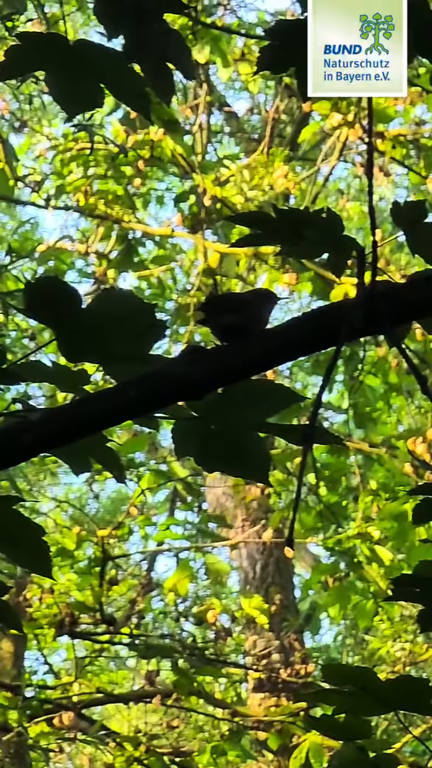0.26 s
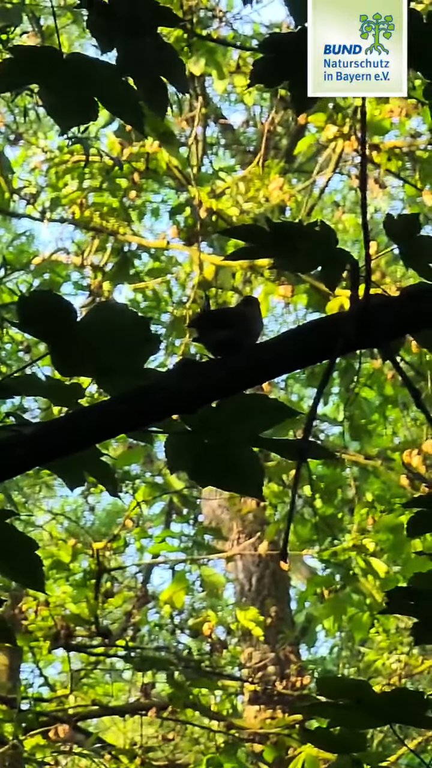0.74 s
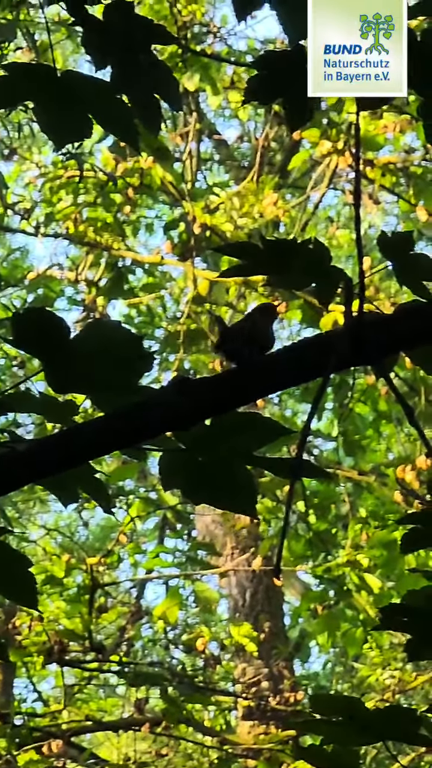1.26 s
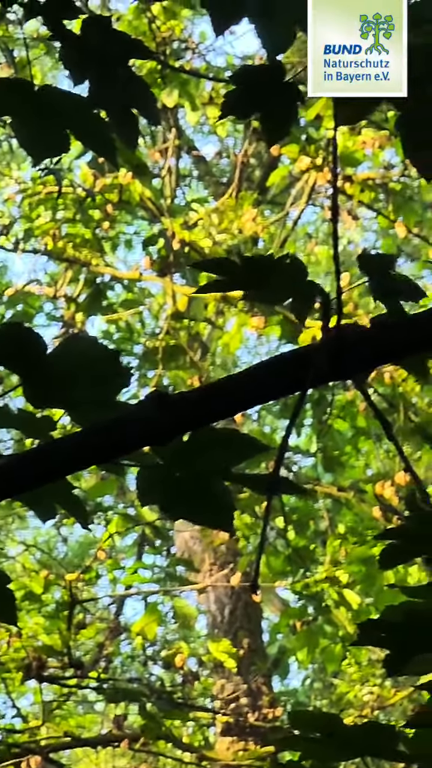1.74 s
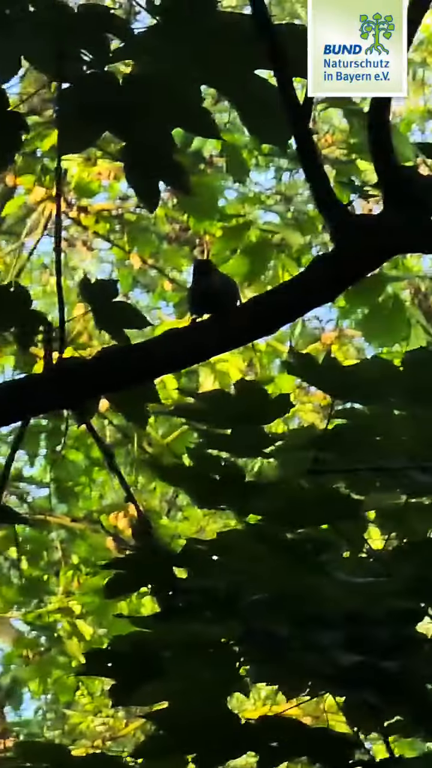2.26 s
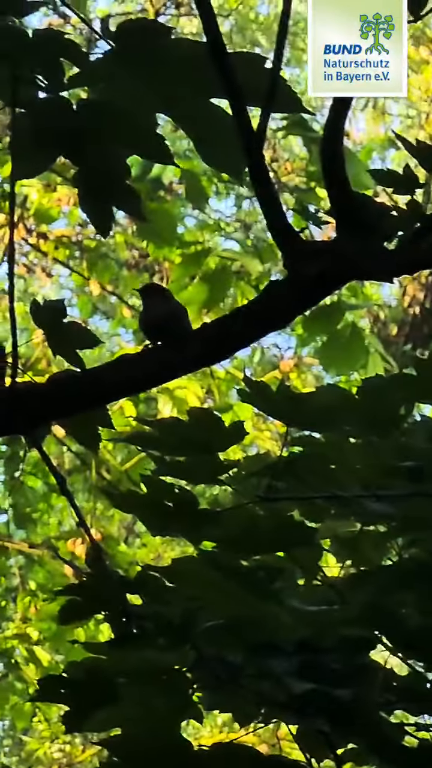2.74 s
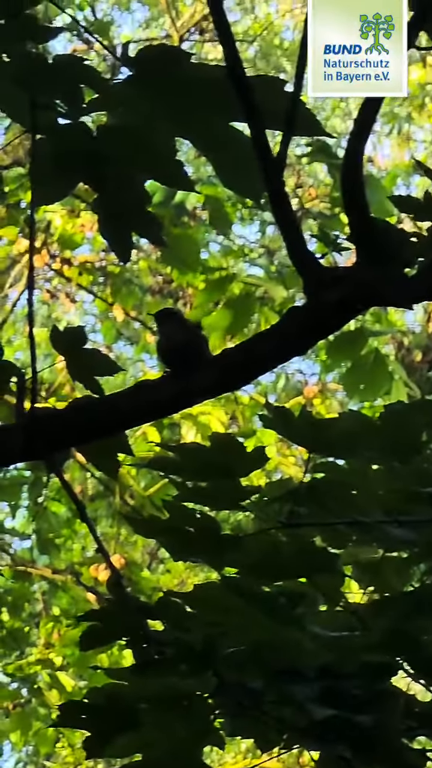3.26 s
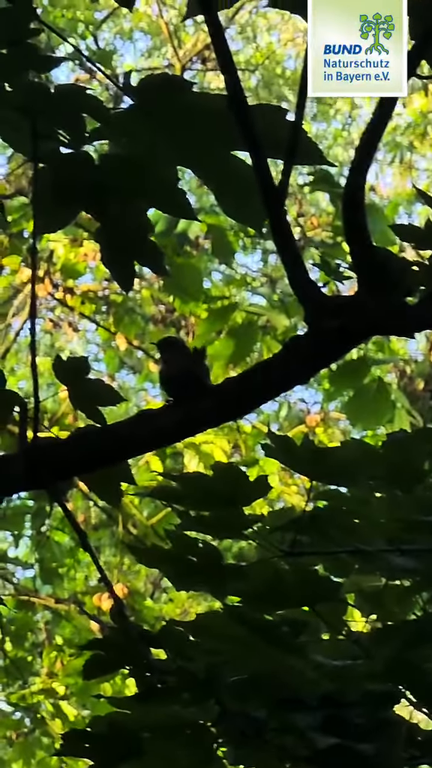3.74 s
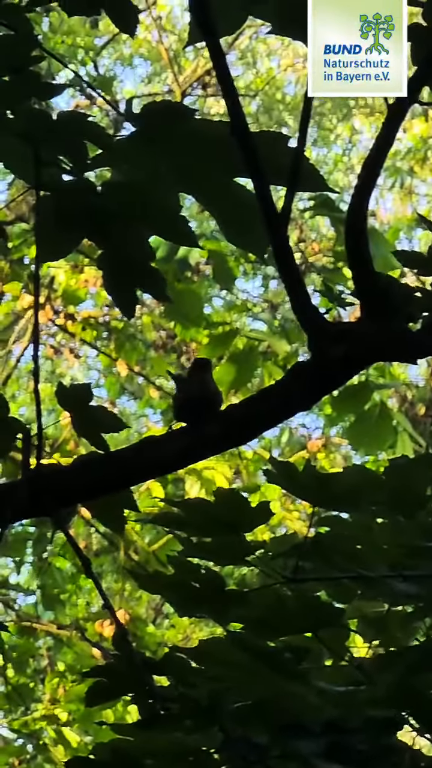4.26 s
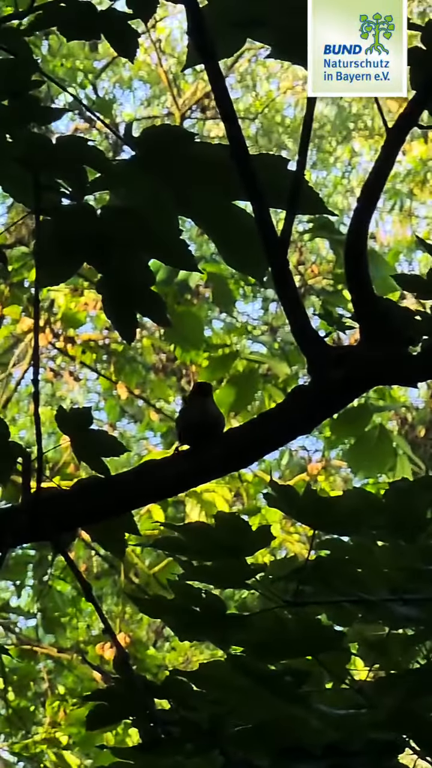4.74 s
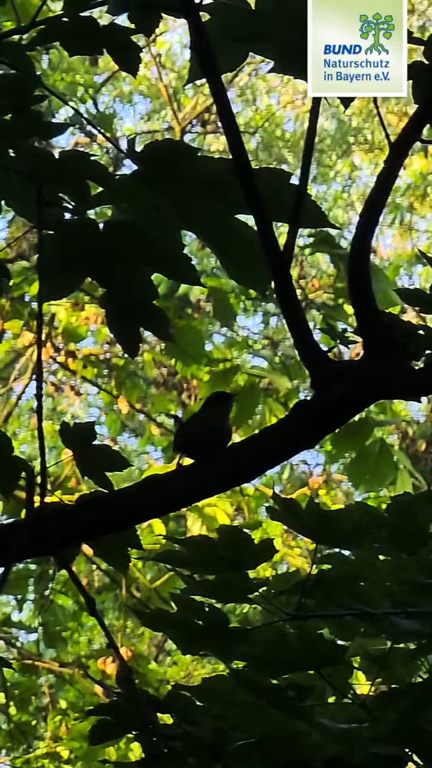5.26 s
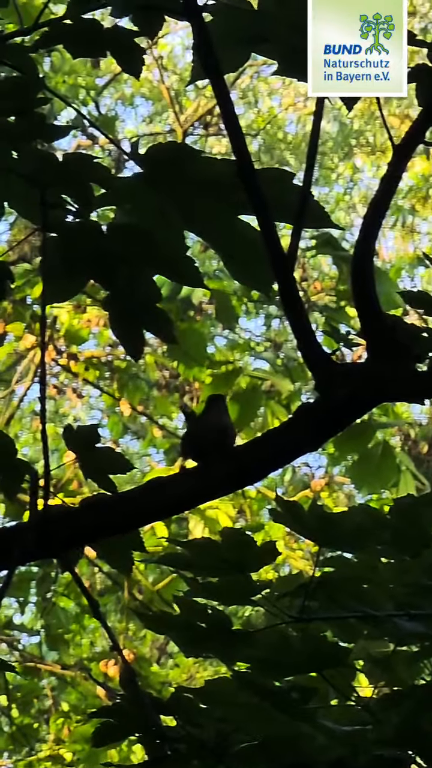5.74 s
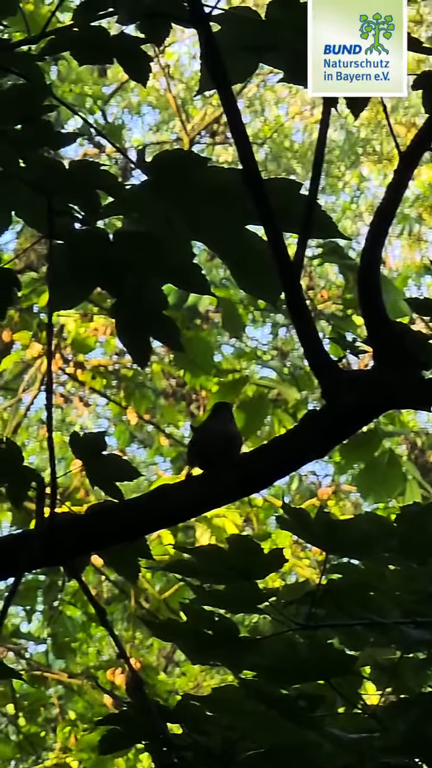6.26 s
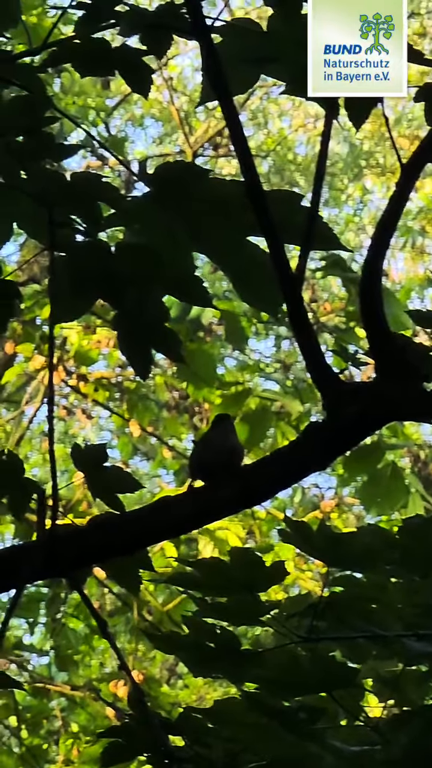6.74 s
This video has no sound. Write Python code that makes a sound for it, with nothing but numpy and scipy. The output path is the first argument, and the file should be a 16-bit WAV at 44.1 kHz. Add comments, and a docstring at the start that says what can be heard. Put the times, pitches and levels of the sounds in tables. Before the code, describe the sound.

A small wren close by sings one long, rapid song of slurs, upsweeps, trill and rattle while distant birds whistle in an echoing wood.

```python
"""Over a low distant rumble that swells, far birds whistle and warble from the start, one with a thin high call.
From a quarter second a far chaffinch joins in: buzzy falling sweeps, quicker ones, rising chirps, a flourish.
From 1.2 s a near wren sings one long song of slurs, upsweeps, a fast trill, couplets and a rattle of ticks.
Each note is a gliding tone with faint overtones; branch and leaves scatter it and the wood rings on."""
import sys
import numpy as np
from scipy import signal
from scipy.fft import rfft, irfft
from scipy.io import wavfile
from scipy.ndimage import uniform_filter1d, minimum_filter1d

SR = 44100
rng = np.random.default_rng(int(sys.argv[2]) if len(sys.argv) > 2 else 0)


def int16_out(signal):
    """Quantize to a 16-bit WAV file."""
    q = np.round(np.clip(np.atleast_2d(signal).T, -1, 1) * 32767)
    wavfile.write(sys.argv[1], SR, q.astype(np.int16))


N = 308700
FREQS = np.fft.rfftfreq(2 * N, 1 / SR)  # padded to twice the length, so filters do not wrap round
FAR_OVERTONE_DB = -27.5  # overtones are lost on the way through the wood


def undb(db):
    """Decibels to gain."""
    return 10 ** (np.asarray(db) / 20)


def at_hz(points, hz):
    """Read (Hz, value) points on a log-frequency axis."""
    f, value = np.transpose(points)
    return np.interp(np.log(np.maximum(hz, 1)), np.log(f), value)


def colour(x, gain):
    """Filter by a gain for each of FREQS."""
    return irfft(rfft(x, 2 * N) * gain)[..., :N]


def unit(x):
    """Scale to rms 1."""
    return x / np.sqrt(np.mean(x ** 2))


def walk(size, rate):
    """Smooth chance with a spread a little under 1, heading for a new value rate times a second."""
    k = max(int(SR / rate), 1)
    steps = np.repeat(rng.standard_normal(size // k + 1), k)
    return uniform_filter1d(steps, k)[:size]


def add(out, s, x):
    """Mix x into out from time s."""
    i = max(int(s * SR), 0)
    out[i:i + len(x)] += x[:max(N - i, 0)]


def spread(length_s, pitch):
    """Even times for the points of a pitch path."""
    return np.linspace(0, length_s, len(pitch))


def bent(from_hz, to_hz, bend):
    """Pitch path whose steps shrink exponentially (grow, if bend is negative), evenly spaced in time."""
    steps = np.exp(-bend * np.linspace(0, 1, 16))
    way = np.concatenate([[0], np.cumsum(steps)])
    return from_hz + (to_hz - from_hz) * way / way[-1]


def glide(times, values, size, ease_s=0.0013):
    """A control moving through its points, its corners rounded by the muscles' inertia."""
    line = np.interp(np.linspace(times[0], times[-1], size), times, values)
    return uniform_filter1d(line, int(np.clip(ease_s * SR, 1, size // 4)), mode="nearest")


# How strongly overtones radiate, before each voice's own offset.
# Each row: frequency in Hz, level against the fundamental in dB.
OVERTONE_LEVELS = [(8300, -43), (10000, -48), (12000, -38), (15000, -26.5)]


def syrinx(times, pitch, levels, fade_s, waver=0.0063, waver_hz=400, overtone_db=0):
    """One note: a gliding tone that wavers a little, with faint second and third harmonics."""
    size = max(int((times[-1] - times[0]) * SR), 64)
    u = np.linspace(0, 1, size)
    hz = glide(times, pitch, size) * (1 + waver * walk(size, rate=waver_hz))
    db = np.interp(u, (np.arange(len(levels)) + .5) / len(levels), levels)
    # a note swells in twice as slowly as it stops
    from_edge = np.minimum(u, 2 * (1 - u)) * size / SR
    gate = np.sin(np.pi / 2 * np.clip(from_edge / fade_s, 0, 1)) ** 2
    phase = 2 * np.pi * np.cumsum(hz) / SR
    tone = np.sin(phase)
    for k in (2, 3):
        in_range = np.clip((SR / 2 - k * hz) / (SR / 20), 0, 1)  # fades out towards half the sample rate
        strength = undb(overtone_db + at_hz(OVERTONE_LEVELS, k * hz)) * in_range
        tone = tone + strength * np.sin(k * phase)
    return np.sqrt(2) * undb(db) * gate * tone


def repeat(syllable, fade_s, waver=0.014, waver_hz=400, overtone_db=0, scatter=0.0083):
    """One syllable at a steady beat, its pitch shifted by chance each time; some series grow louder.

    Pitches and levels (before the mix) are spread evenly over the syllable."""
    out = np.zeros(N)
    for k in range(syllable["count"]):
        pitch = np.array(syllable["pitch_hz"]) * (1 + scatter * rng.standard_normal())
        levels = np.array(syllable["level_db"]) + k * syllable.get("grow_db", 0)
        times = spread(syllable["length_s"], pitch)
        note = syrinx(times, pitch, levels, fade_s, waver, waver_hz, overtone_db)
        add(out, syllable["start_s"] + k * syllable["period_s"], note)
    return out


def far_notes(table, bend, waver, waver_hz, ends_db):
    """Wavering slurs from deeper in the wood, each swelling to its middle."""
    out = np.zeros(N)
    for start, length, from_hz, to_hz, db in table:
        pitch = bent(from_hz, to_hz, bend)
        levels = [db + ends_db, db, db, db + ends_db]
        note = syrinx(spread(length, pitch), pitch, levels, 0.0069, waver, waver_hz, FAR_OVERTONE_DB)
        add(out, start, note)
    return out


# Spectrum of distant rumble and air. Each row: frequency in Hz, relative level per Hz in dB.
AIR_SPECTRUM = [(20, -33.5), (40, -11), (62, 1), (90, -9.5), (140, -19.5), (230, -16.5), (500, -26),
                (850, -23), (1600, -34.5), (3000, -25), (6500, -35), (9000, -60)]
# Swell of the rumble. Each row: time in seconds, gain in dB.
RUMBLE_SWELL = [(0, -2), (2.5, -2.5), (5.302, -5), (6.201, 3), (7, -4)]


def air(apart_hz=1500, rumble_hz=110, level_db=-52.5, drift_db=2.3):
    """Shaped noise: far rumble that swells, nearly alike at both ports, under a soft unrelated rustle."""
    mid, side = rng.standard_normal((2, N))
    gain = undb(at_hz(AIR_SPECTRUM, FREQS))
    width = np.clip(FREQS / apart_hz, .16, 1)  # the ports differ more as frequency rises
    both = unit(colour(mid, gain) + colour(side, gain * width) * np.array([[1], [-1]]))
    rumble = colour(both, 1 / (1 + (FREQS / rumble_hz) ** 4))
    swell = undb(np.interp(np.arange(N) / SR, *np.transpose(RUMBLE_SWELL)))
    return (both + (swell - 1) * rumble) * undb(level_db + drift_db * walk(N, rate=3))


def twitter(end_s=2.8, notes_per_s=8, length_s=.03, low_hz=2500, high_hz=3800, glide_share=.25, db=-49):
    """Rows of faint short slurs behind the finch, at chance times, pitches and glides up or down."""
    rows = []
    for when, height, way in rng.random((int(notes_per_s * end_s), 3)):
        hz = low_hz + (high_hz - low_hz) * height
        to_hz = hz * (1 + glide_share * (2 * way - 1))
        rows.append((when * end_s, length_s, hz, to_hz, db))
    return rows


# The clearer whistles of other birds.
# Each row: start in seconds, length in seconds, pitch from and to in Hz, level in dB.
WHISTLE_NOTES = [(.028, 0.032, 3850, 3220, -39), (.07, 0.084, 3337, 3272, -40),
                 (.125, 0.028, 3210, 4380, -49), (.13, 0.027, 3060, 2490, -45),
                 (.195, 0.025, 2880, 2640, -42), (1.55, 0.033, 3280, 3436, -35.5),
                 (2.1, 0.06, 1647, 1795, -53), (2.765, 0.032, 3190, 3810, -37.5),
                 (3.43, 0.03, 3450, 2970, -38.5), (3.515, 0.051, 2850, 2703, -42.5),
                 (3.62, 0.32, 2060, 2247, -59.5), (4.64, 0.045, 926, 1695, -60.5),
                 (4.675, 0.078, 1765, 2563, -43), (5.14, .16, 2204, 2306, -52),
                 (5.462, 0.027, 4980, 4580, -41), (5.712, 0.054, 2920, 2604, -39),
                 (5.805, 0.021, 2990, 2987, -28.5), (5.903, 0.032, 3925, 3110, -31.5),
                 (6.47, 0.09, 3480, 3525, -50.5), (6.83, 0.039, 3400, 3350, -49.5)]


def whistles():
    """Far slurs that waver slowly and settle on their last pitch, with the twitter among them."""
    return far_notes(WHISTLE_NOTES + twitter(), bend=1.8, waver=0.016, waver_hz=82, ends_db=-2)


# A thin, very high call. Keys: start, period and length in seconds, count, pitch in Hz, level in dB.
THIN_SYLLABLE = dict(start_s=.265, period_s=0.32, count=3, length_s=0.21, pitch_hz=[7600, 8250, 8300, 8200],
                 level_db=[-55])


def thin_call():
    """Another bird's nearly level tone, rising at its start."""
    return repeat(THIN_SYLLABLE, fade_s=0.013, waver=0.016, overtone_db=FAR_OVERTONE_DB)


# Other birds' warbled notes.
# Each row: start in seconds, length in seconds, level in dB, pitches in Hz spread evenly over the note.
WARBLE_NOTES = [(0.278, 0.13, -46.5, [2946, 3146, 3290, 3690, 3300, 3580]),
                (0.499, 0.1, -40.5, [3286, 2800, 2480, 2467, 2700, 2474, 2130]),
                (0.745, 0.051, -37, [3040, 2740, 2940, 2910]), (0.83, 0.041, -34, [3060, 2897, 2930, 3300]),
                (4.356, 0.025, -33.5, [3360, 3440, 3270, 2640]),
                (4.975, 0.063, -35.5, [3330, 3245, 3290, 2910, 2775]),
                (6.052, 0.13, -35.5, [3486, 3030, 3050, 3105, 3186, 3227, 2910, 3150, 3184]),
                (6.206, 0.094, -40.5, [2727, 2760, 2660, 2580, 2672, 2830]),
                (6.551, 0.052, -31.5, [5250, 5110, 4760, 4760, 4850]),
                (6.686, 0.036, -37, [5700, 4680, 4850]),
                (6.737, 0.11, -43.5, [2460, 2470, 2306, 2520, 2354, 2287, 2584, 2330, 2360]),
                (6.896, 0.12, -46, [2800, 3020, 2780, 2700, 3200, 3050, 3330])]


def warbles(fade_s=0.0077, waver=0.0071):
    """Far notes that turn up and down as they go."""
    out = np.zeros(N)
    for start, length, db, pitch in WARBLE_NOTES:
        note = syrinx(spread(length, pitch), pitch, [db], fade_s, waver, overtone_db=FAR_OVERTONE_DB)
        add(out, start, note)
    return out


# The chaffinch's opening notes and closing flourish.
# Each row: start in seconds, length in seconds, pitch from and to in Hz, level in dB.
FINCH_NOTES = [(.25, 0.068, 5860, 4480, -50), (.39, 0.11, 6030, 4394, -43), (2.235, 0.031, 4000, 3160, -35),
               (2.28, 0.047, 3430, 2830, -36.5), (2.33, 0.038, 2830, 1990, -49),
               (2.35, 0.086, 3200, 1970, -43), (2.49, 0.044, 3600, 2675, -34),
               (2.55, 0.14, 3730, 2270, -44)]
# Slow falling sweeps that grow louder, and the pips that lead into them after the first.
# Keys: start, period and length in seconds, count, pitch in Hz, level in dB, growth per syllable in dB.
FINCH_SLOW_SWEEP = dict(start_s=.597, period_s=.179, count=4, length_s=0.078, pitch_hz=[5950, 4450, 2380],
                    level_db=[-42, -38.5, -39.5, -41], grow_db=1.5)
FINCH_PIP = dict(start_s=.75, period_s=0.19, count=3, length_s=0.012, pitch_hz=[5410, 5640], level_db=[-40],
             grow_db=4.5)
# Quicker sweeps, and the low strokes near the start of the first three; keys and units as above.
FINCH_QUICK_SWEEP = dict(start_s=1.298, period_s=.130, count=4, length_s=.045, pitch_hz=[5500, 3650, 2300],
                     level_db=[-33, -34, -33, -41], grow_db=.7)
FINCH_LOW_STROKE = dict(start_s=1.3, period_s=0.12, count=3, length_s=0.021, pitch_hz=[3240, 2530, 2040],
                    level_db=[-44.5], grow_db=3.5)


def chaffinch(waver=.052, quick_waver=.022, waver_hz=510):
    """Fast pitch waver makes the slow sweeps buzz; the quicker ones waver less and sound cleaner."""
    slow = sum(repeat(part, 0.0094, waver, waver_hz, FAR_OVERTONE_DB)
               for part in (FINCH_SLOW_SWEEP, FINCH_PIP))
    quick = sum(repeat(part, 0.006, quick_waver, waver_hz, FAR_OVERTONE_DB)
                for part in (FINCH_QUICK_SWEEP, FINCH_LOW_STROKE))
    return slow + quick + far_notes(FINCH_NOTES, .6, waver, waver_hz, ends_db=-3.0)


# The wren's one-way slurs; a positive bend moves early and settles, a negative one moves late.
# Each row: start in seconds, length in seconds, pitch from and to in Hz, bend (no unit), attack in seconds,
# level in dB, change of level from first half to second in dB.
WREN_SLURS = [(1.231, .05, 5850, 5206, 2, .016, -21, 1), (1.399, .037, 5700, 6750, -0.46, .01, -8, -4.5),
              (1.44, 0.079, 6920, 6430, 4.5, 0.0087, -26, -8),
              (1.908, .105, 5278, 4703, 2, 0.012, -6, -8.5),
              (2.046, .146, 8610, 6583, 2.5, 0.05, -9.5, -3.5),
              (2.281, .03, 9000, 7460, 0.5, 0.0074, -27, 3),
              (3.056, 0.059, 4730, 3836, 2, 0.027, -12.5, -3.5),
              (3.182, .032, 5216, 5876, -0.8, 0.0065, -2.5, -10.5),
              (4.432, .098, 5198, 4737, 4, 0.0066, -11.5, 0),
              (4.575, 0.038, 6490, 8060, -0.2, 0.0049, -13.5, -1.5),
              (4.646, .083, 5690, 3705, 1.36, 0.012, -10, -13.5),
              (4.966, .02, 4350, 4066, 3.5, 0.013, -17.5, -2),
              (5.018, .063, 3977, 3903, -1.5, 0.0082, -17, -3.5),
              (5.144, .064, 8950, 8116, 6, 0.026, -21, 0.5),
              (5.207, .144, 7937, 7380, 0.6, .009, -17.5, -5),
              (5.399, .055, 3680, 3976, 1.1, 0.0072, -20.5, 0),
              (5.807, .062, 5402, 4016, -0.45, 0.0093, -7.5, -16.5)]
# Arched notes, flicked up and let down again.
# Each row: start, rise and fall in seconds, pitch at start, top and end in Hz, level in dB, change in dB.
WREN_ARCHES = [(1.528, 0.015, 0.07, 4910, 5580, 4200, -16, -7.5),
               (1.647, 0.014, .064, 5370, 5765, 4320, -11.5, -5),
               (1.774, 0.0093, 0.026, 7700, 7860, 6670, -15.5, 0),
               (2.194, 0.0055, 0.038, 5260, 6110, 3950, -11.5, -0.5),
               (3.15, 0.0083, 0.024, 5160, 6680, 5205, -15.5, 6.5),
               (3.721, .017, 0.048, 5506, 6734, 5116, -10.5, -0.5),
               (3.887, .021, .035, 4754, 6530, 5420, -10, -4.5),
               (4.544, 0.021, 0.016, 5380, 8260, 6590, -27, 8.5),
               (4.889, 0.03, 0.024, 5730, 6237, 5210, -7, -2.5),
               (5.724, .016, 0.021, 5030, 7785, 6140, -15.5, 6)]
# Long upsweeps. Keys: start, period and length in seconds, count, pitch in Hz, level in dB.
WREN_UPSWEEP = dict(start_s=2.358, period_s=.2295, count=3, length_s=0.16, pitch_hz=[4100, 4250, 4700, 5270, 5750, 6800, 7620, 7750, 7150],
                level_db=[-19, -16, -17, -15.5, -6, -7.5, -11, -25, -29, -27, -27, -28])
# A couplet sung twice: a low rising note, then a high whistle that drops at its end; keys as above.
WREN_COUPLET_LOW = dict(start_s=3.961, period_s=.198, count=2, length_s=.063, pitch_hz=[3780, 3850, 3950, 4250, 5000],
                    level_db=[-31, -33, -28, -17, -21])
WREN_COUPLET_HIGH = dict(start_s=4.028, period_s=.199, count=2, length_s=.095, pitch_hz=[7500, 7280, 7170, 7090, 6980, 6050],
                     level_db=[-16.5, -17.5, -14.5])
# A dry rattle of ticks, then low slurs before the closing notes; keys as above and growth per syllable in dB.
WREN_RATTLE = dict(start_s=4.7515, period_s=.028, count=5, length_s=0.0038, pitch_hz=[7000, 5800, 5000],
               level_db=[-16], grow_db=1)
WREN_LOW_SLUR = dict(start_s=5.490, period_s=.085, count=3, length_s=.045, pitch_hz=[3830, 4330, 4160, 3655, 3450],
                 level_db=[-12, -13, -20], grow_db=-1)


def wren(rise_bend=1.8, fall_bend=.46, arch_attack_s=.0056):
    """Slurs and arches between the repeated parts: upsweeps, a couplet, a rattle and low slurs."""
    out = np.zeros(N)
    for start, length, from_hz, to_hz, bend, attack_s, db, change in WREN_SLURS:
        pitch = bent(from_hz, to_hz, bend)
        add(out, start, syrinx(spread(length, pitch), pitch, [db, db + change], attack_s, waver=0.0049))
    for start, rise_s, fall_s, from_hz, top_hz, to_hz, db, change in WREN_ARCHES:
        up = bent(from_hz, top_hz, rise_bend)
        down = bent(top_hz, to_hz, fall_bend)
        times = np.concatenate([spread(rise_s, up), rise_s + spread(fall_s, down)])
        add(out, start, syrinx(times, np.concatenate([up, down]), [db, db + change], arch_attack_s))
    out += repeat(WREN_UPSWEEP, fade_s=0.01)
    out += repeat(WREN_COUPLET_LOW, fade_s=.007, waver=0.025)
    out += repeat(WREN_COUPLET_HIGH, fade_s=0.0062, waver=0.0041)
    out += repeat(WREN_RATTLE, fade_s=0.0021)
    return out + repeat(WREN_LOW_SLUR, fade_s=0.018)


# The finch's rising chirps, and the falling stroke that runs into each.
# Keys: start, period and length in seconds, count, pitch in Hz, level in dB.
FINCH_CHIRP = dict(start_s=1.855, period_s=.0705, count=5, length_s=0.028, pitch_hz=[2550, 3060, 3800],
               level_db=[-41, -35, -40])
FINCH_DIP = dict(start_s=1.835, period_s=.0705, count=5, length_s=.024, pitch_hz=[3150, 2700, 2000],
             level_db=[-42])


def finch_chirps():
    """Each chirp falls, then rises, its pitch scattered more than in the sweeps."""
    return sum(repeat(part, fade_s=0.0055, waver=.03, overtone_db=FAR_OVERTONE_DB, scatter=0.026)
               for part in (FINCH_DIP, FINCH_CHIRP))


# The wren's fast trill of hooked down-slurs.
# Keys: start, period and length in seconds, count, pitch in Hz, level in dB.
TRILL_SYLLABLE = dict(start_s=3.231, period_s=.0541, count=9, length_s=0.039, pitch_hz=[4800, 5000, 5200, 5000, 4650, 4200, 4050, 3750],
                  level_db=[-20, -19, -17, -13.5, -17])


def wren_trill():
    """The same hooked slur at a fast beat, with fainter overtones than the rest of the song."""
    return repeat(TRILL_SYLLABLE, fade_s=0.0089, waver=0.026, overtone_db=-3.5)


# A short distant churr of steep ticks.
# Keys: start, period and length in seconds, count, pitch in Hz, level in dB, growth per tick in dB.
CHURR_TICK = dict(start_s=6.428, period_s=0.036, count=2, length_s=0.016, pitch_hz=[6500, 5340, 3370],
              level_db=[-50], grow_db=7)


def churr():
    """Ticks that fall steeply with a rough waver, the second louder."""
    return repeat(CHURR_TICK, fade_s=.005, waver=0.07, overtone_db=FAR_OVERTONE_DB)


# Direct sound at the two ports. Each row: frequency in Hz, left minus right in dB.
PORT_BALANCE = [(3600, 3), (4200, 7.5), (4900, -10), (6000, -9), (8000, -5)]


def ports(x, lag_s=0.0001912, echo_s=0.0085, echo_db=-9):
    """The direct sound and one echo off the bough reach the left port first."""
    pan = undb(at_hz(PORT_BALANCE, FREQS) * np.array([[.5], [-.5]]))
    pan /= np.sqrt(np.mean(pan ** 2, axis=0))  # same power at every frequency
    lag = np.exp(-2j * np.pi * FREQS * np.array([[0], [lag_s]]))
    echo = 1 + undb(echo_db) * np.exp(-2j * np.pi * FREQS * echo_s)
    return colour(x, pan * lag * echo)


# Ring of the wood. Each row: frequency in Hz, time to fall 60 dB in seconds.
RING_TIMES = [(2500, 1.3), (5000, 0.71), (8000, 0.58), (14000, 0.32)]


def wood(x, leaves_db, leaves_s, tail_db, build_s, clump_db=4.5, clumps_per_s=45):
    """Sparse early reflections off near leaves, then a tail returned in clumps by trunks and crowns."""
    t = np.arange(int(1.5 * SR)) / SR
    sparse = rng.standard_normal((2, len(t))) * (rng.random((2, len(t))) < .05)
    leaves = sparse * np.exp(-t / leaves_s) * (t > .001)
    leaves /= np.sqrt(np.sum(leaves ** 2, axis=1, keepdims=True))
    noise, hz = rfft(rng.standard_normal((2, len(t)))), np.fft.rfftfreq(len(t), 1 / SR)
    centres = np.geomspace(2000, 14000, 12)
    tail = 0
    # each band clumps differently in each channel
    for share, centre in zip(np.eye(len(centres)), centres):
        band = at_hz(np.column_stack([centres, share]), hz)
        clumps = undb(clump_db * np.array([walk(len(t), rate=clumps_per_s) for _ in range(2)]))
        decay = np.exp(-np.log(1000) * t / at_hz(RING_TIMES, centre))
        fade = clumps * decay * (1 - np.exp(-t / build_s))
        tail = tail + irfft(noise * band, len(t)) * fade / np.sqrt(np.sum(fade ** 2, axis=1, keepdims=True))
    response = undb(leaves_db) * leaves + undb(tail_db) * tail
    return signal.fftconvolve(x[None], response, axes=1)[:, :N]


# The overtones beam past the microphone into the leaves.
# Each row: frequency in Hz, gain in dB given to the scattered sound and taken from the direct sound.
BEAM_GAIN = [(8500, -0.5), (11000, 1.5)]


def scene():
    """The near wren comes both direct and off the leaves, with a weak tail; the far birds ring more."""
    clear = whistles() + thin_call() + warbles() + finch_chirps() + churr()
    clear_wood = wood(clear, leaves_db=-1.0, leaves_s=0.017, tail_db=-3.0, build_s=0.0018)
    clear = undb(-3.0) * ports(clear) + clear_wood

    finch = chaffinch()
    finch_wood = wood(finch, leaves_db=-2.5, leaves_s=0.014, tail_db=2.5, build_s=0.0039)
    finch = undb(-4.5) * ports(finch) + finch_wood
    finch = finch * undb(np.array([[-1], [1]]) * 0.74)  # raised a little on the right

    near, trill = wren(), wren_trill()
    beam = undb(at_hz(BEAM_GAIN, FREQS))
    # the head is turned aside in the trill, so more of it arrives by way of the leaves
    direct = undb(-4.5) * near + undb(-6) * trill
    scattered = colour(near + trill, beam)
    song = ports(colour(direct, 1 / beam))
    song = song + wood(scattered, leaves_db=-4.5, leaves_s=0.02, tail_db=-14.0, build_s=0.021)
    return air() + clear + finch + song


def record(dry, top_hz=15900):
    """A look-ahead limiter holds the loudest notes under full scale; then the top is cut steeply."""
    ceiling, hold = .93, int(.008 * SR)
    need = ceiling / np.maximum(np.abs(dry).max(axis=0), ceiling)
    held = dry * uniform_filter1d(minimum_filter1d(need, 2 * hold), hold)
    return signal.sosfilt(signal.ellip(10, .2, 80, top_hz, fs=SR, output="sos"), held)


dry = scene()
out = record(dry)
int16_out(out)
```